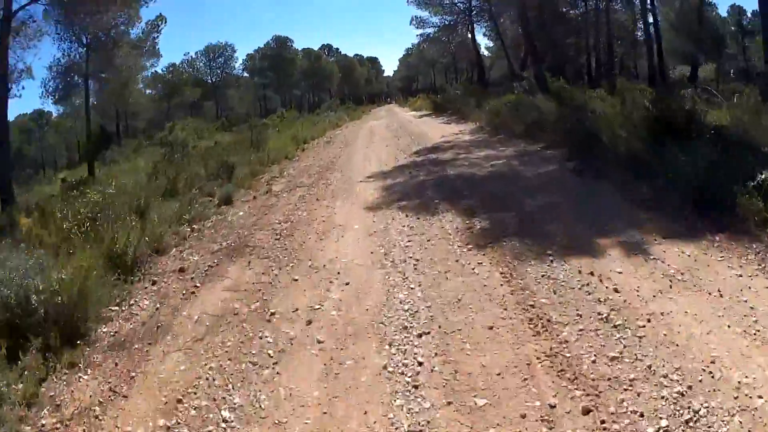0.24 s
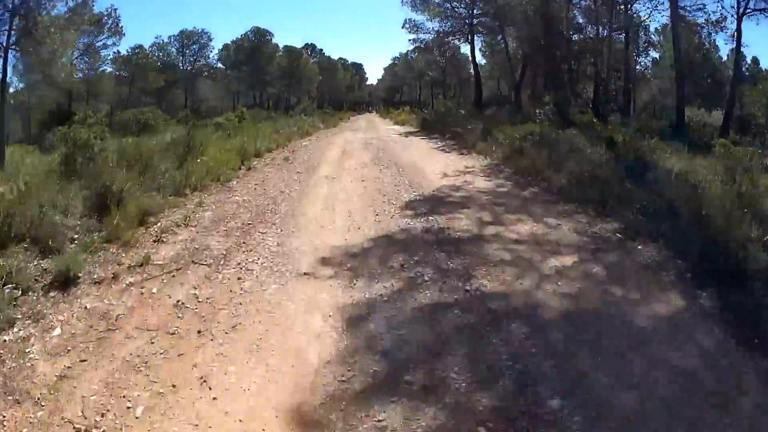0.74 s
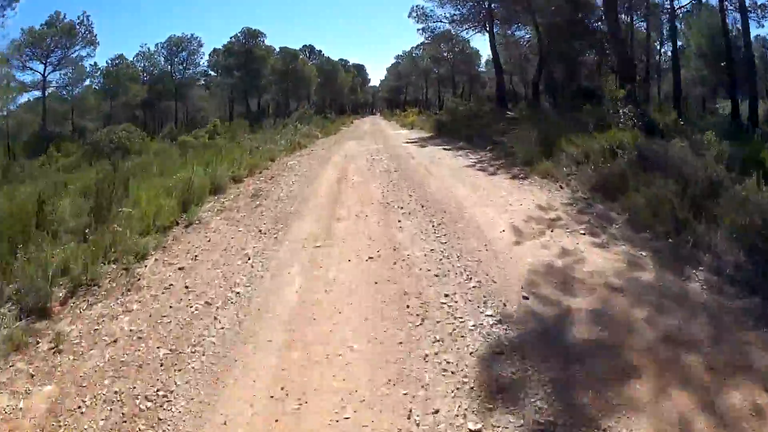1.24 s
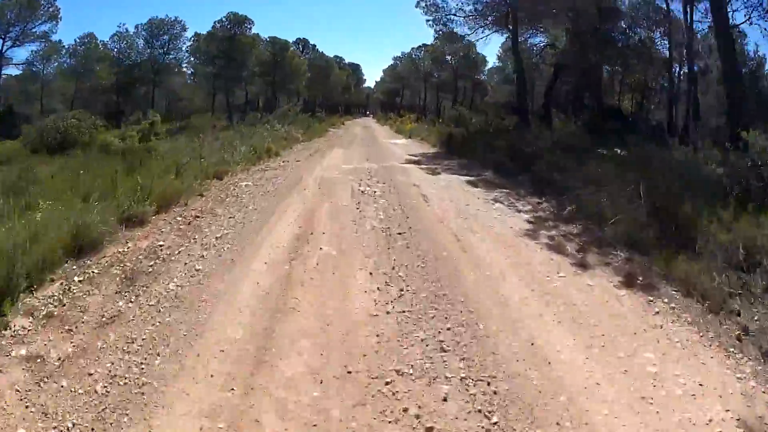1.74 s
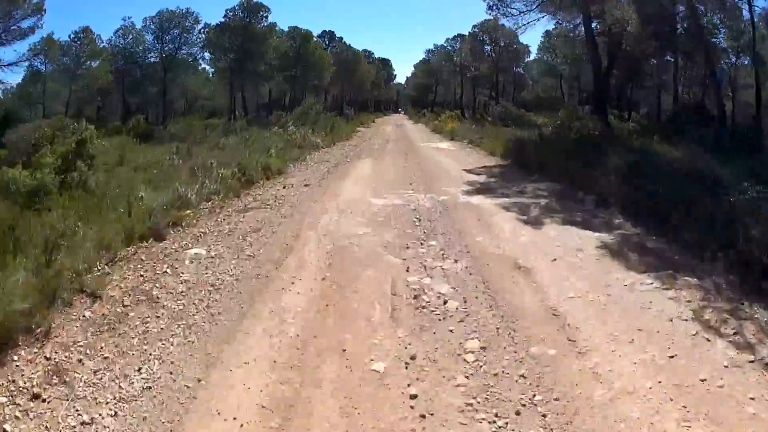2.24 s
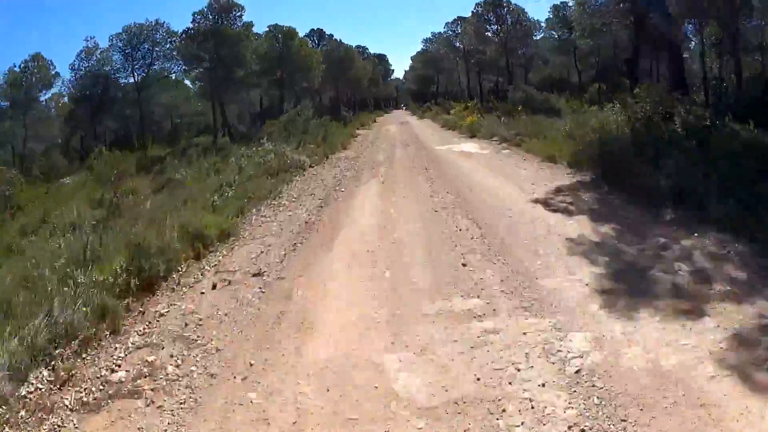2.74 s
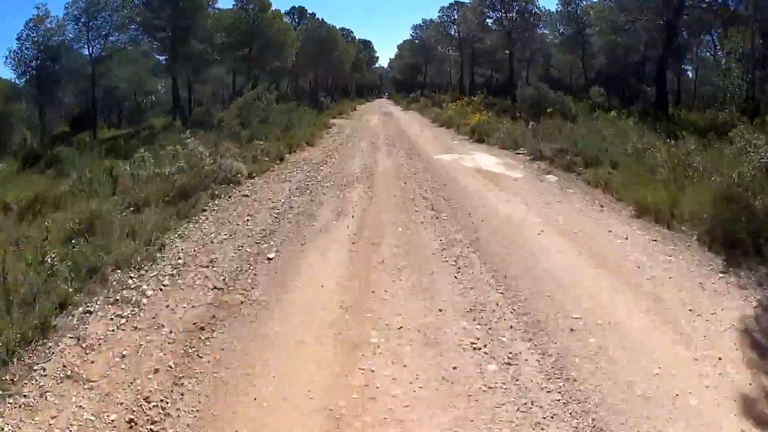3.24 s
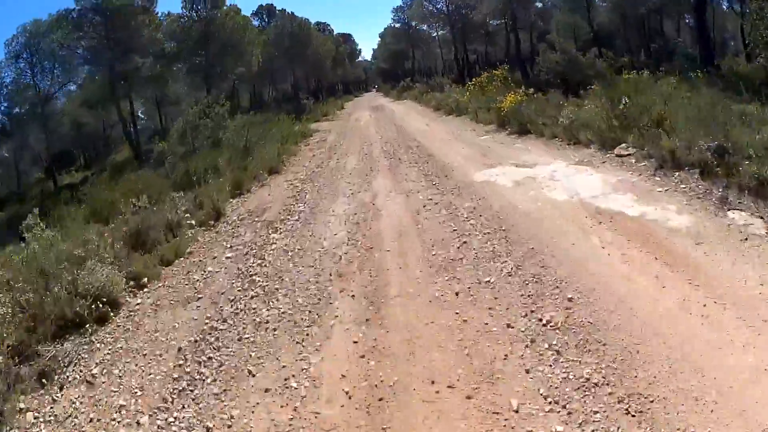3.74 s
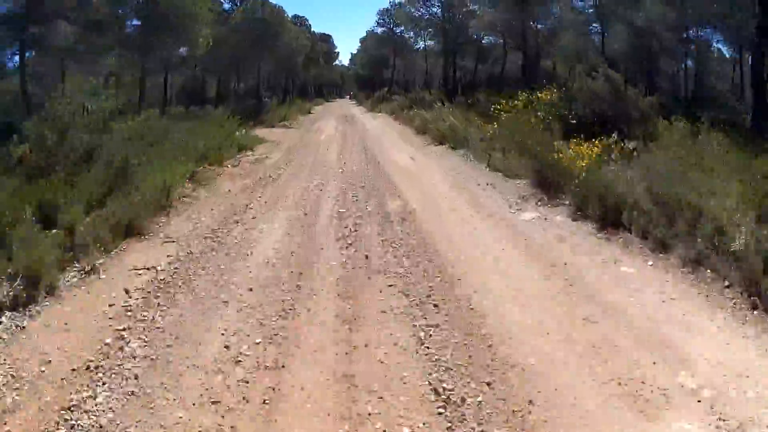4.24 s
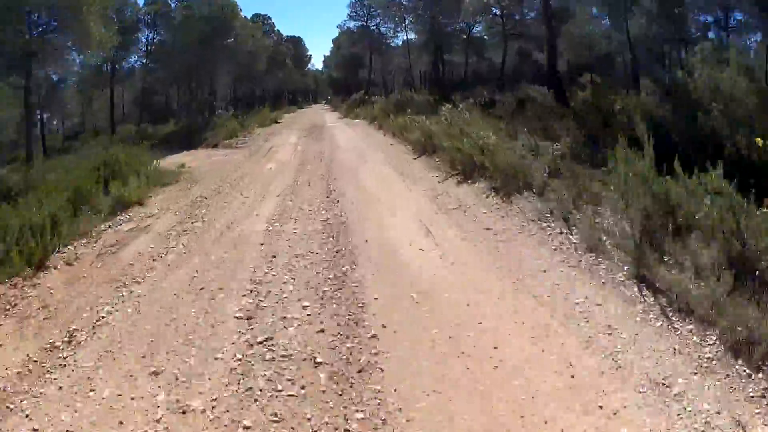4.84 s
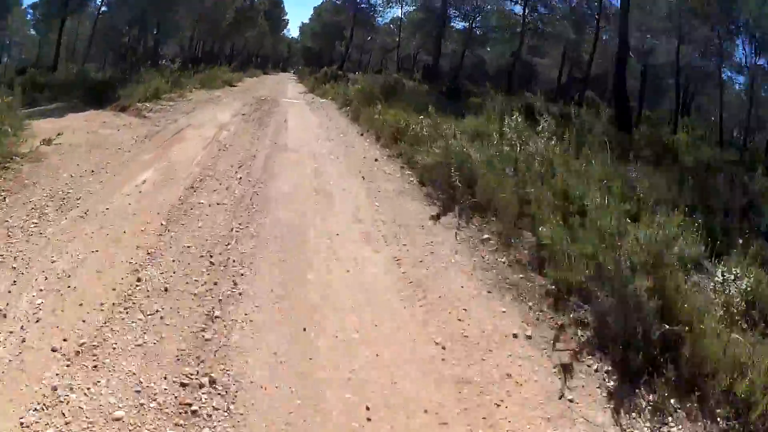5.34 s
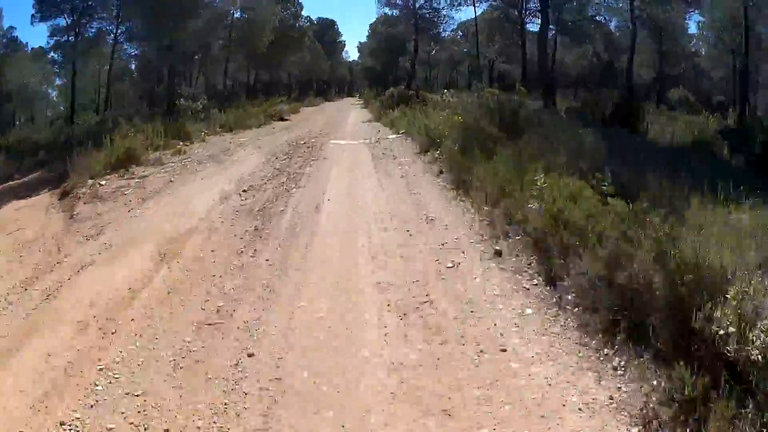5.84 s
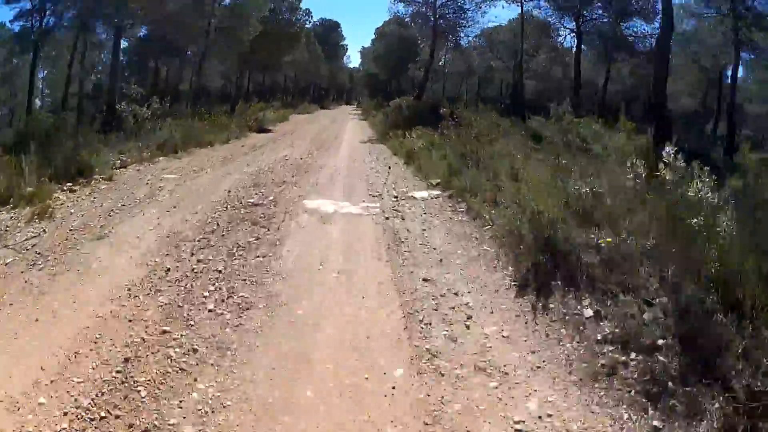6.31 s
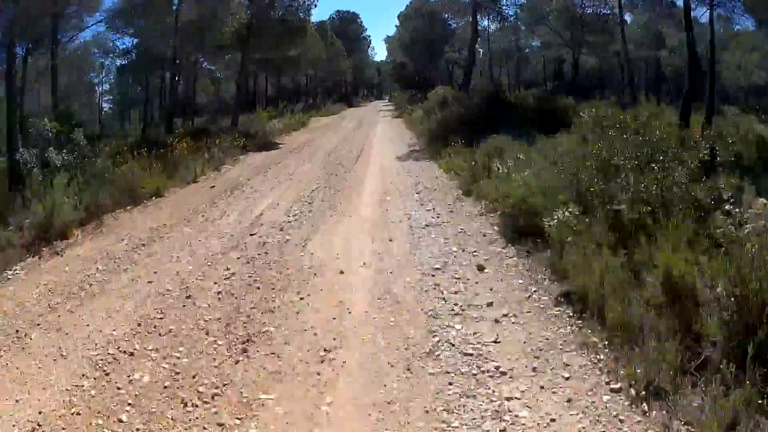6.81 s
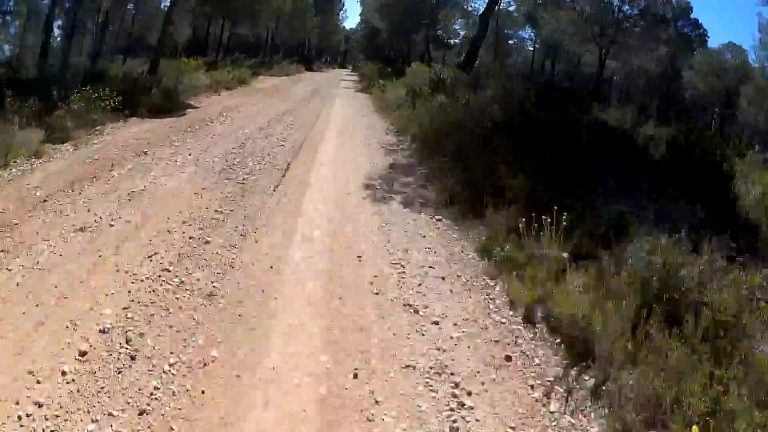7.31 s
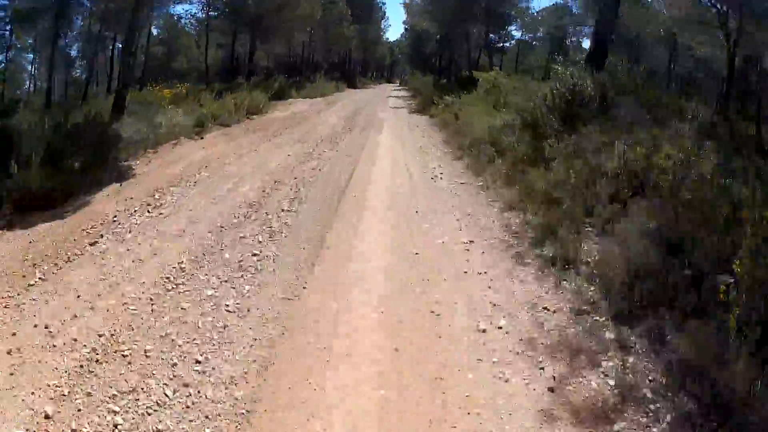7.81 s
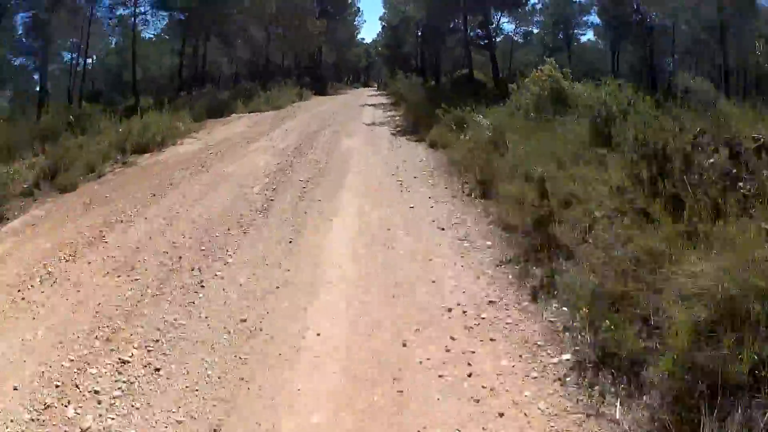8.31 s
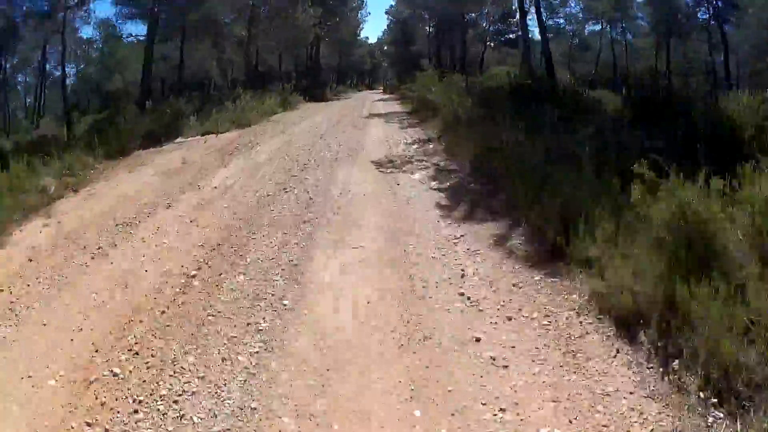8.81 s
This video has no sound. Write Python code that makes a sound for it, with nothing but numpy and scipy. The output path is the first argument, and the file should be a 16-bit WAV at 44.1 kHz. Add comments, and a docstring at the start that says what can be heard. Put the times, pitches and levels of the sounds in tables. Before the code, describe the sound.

Bicycle tyres crunch over loose gravel while stones crack against the frame and the bike rumbles and rattles, growing louder.

```python
"""Hard knocks, then rumbling and crunching: a bicycle rolls faster and faster over loose gravel,
heard from a camera clamped to it. Stones crunch under the tyres and crack on the frame, and a loose
part chatters. Loudest is the camera mount: the road shakes it and ruts jolt it, and its ringing
reaches two microphones through the closed case. The case dulls the treble; the hardest jolts clip."""
import sys
import numpy as np
from scipy import signal
from scipy.fft import rfft, irfft, next_fast_len
from scipy.io import wavfile
from scipy.ndimage import uniform_filter1d, map_coordinates

SR = 44100
rng = np.random.default_rng(int(sys.argv[2]) if len(sys.argv) > 2 else 0)


def master_out(mix):
    """Clip the mix to full scale and print it as 16-bit PCM to the path in sys.argv[1]."""
    frames = np.transpose(np.atleast_2d(mix))
    ceiling = np.clip(frames, -1, 1)
    pcm = np.round(ceiling * 32767).astype(np.int16)
    wavfile.write(sys.argv[1], SR, pcm)


N = 399546
ROCK_HZ = 64.5  # how fast the mount rocks
MUFFLE_HZ = 4860  # the case muffles taps and cracks above this


def amp(db):
    """Turn decibels into a gain."""
    return 10 ** (np.asarray(db) / 20)


def unit(x):
    """Scale x to an average (rms) level of 1."""
    return x / np.sqrt(np.mean(x ** 2) + 1e-20)


def curves(rows):
    """One value per sample for each column after the time."""
    times, *columns = np.transpose(rows)
    return [np.interp(np.arange(N) / SR, times, column) for column in columns]


def wobble(rate):
    """A smooth random curve through rate points a second."""
    return map_coordinates(rng.standard_normal(int(N * rate / SR) + 4), [np.arange(N) * rate / SR])


def filtered(x, response):
    """Filter x with a response given as a function of frequency."""
    size = next_fast_len(N + SR // 4, True)
    return irfft(rfft(x, size) * response(np.fft.rfftfreq(size, 1 / SR)), size)[..., :N]


def mode(f, hz, width):
    """A resonance with gain 1 at hz: the narrower it is, the longer it rings."""
    return 1j * f * width / (hz * hz - f * f + 1j * f * width)


def coloured(x, points):
    """Shape the tone of a stereo sound by rows of (frequency [Hz], left [dB], right [dB])."""
    size = 4096
    hz, *sides_db = np.transpose(points)
    log_f = np.log(np.fft.rfftfreq(size, 1 / SR) + 1)
    gains = amp([np.interp(log_f, np.log(hz), db) for db in sides_db])
    cepstrum = irfft(np.log(gains), size)
    cepstrum[:, 1:size // 2] *= 2  # folded so the filter rings after a hit, never before
    cepstrum[:, size // 2 + 1:] = 0
    return signal.fftconvolve(x, irfft(np.exp(rfft(cepstrum)), size), axes=1)[:, :N]


def stereo_noise(alike):
    """Left and right white noise; alike runs from 0 (unrelated) to 1 (the same)."""
    a, b = rng.standard_normal((2, N))
    turn = np.arccos(np.clip(alike, -1, 1)) / 2
    return np.array([np.cos(turn) * a + np.sin(turn) * b, np.cos(turn) * a - np.sin(turn) * b])


def bursts(rate, spread_db, t60):
    """Loudness of random hits, few large and many small, each fading 60 dB in t60 seconds."""
    when, size = rng.random((int(rate * 10), 2)).T
    starts = (when * (N - 1)).astype(int)
    gain = amp(-spread_db * np.log(1 - size * .975) + 2.3 * wobble(16)[starts])
    decay = amp(-60 / (t60 * SR))
    return unit(signal.lfilter([1], [1, -decay], np.bincount(starts, gain, N)))


def pebbles(rate, spread_db, cycles):
    """Small stones snap, each a short fading tone with its own pitch and left-right balance."""
    when, size, pitch, life, side = rng.random((int(rate * 10), 5)).T[..., None]
    hz = 700 * 8.0 ** pitch
    t = np.arange(200) / SR
    tones = np.sin(2 * np.pi * hz * t) * np.exp(-t * hz / (cycles * (0.22 + life))) * hz / 2000
    starts = (when * (N - 1)).astype(int)
    tones *= amp(-spread_db * np.log(1 - size * .93) + 4.5 * wobble(20)[starts])
    samples = (starts + np.arange(len(t))).ravel()
    sides = [tones * amp(pan_db * (side - 1.5)) for pan_db in (3, -3)]
    return unit(np.array([np.bincount(samples, x.ravel(), N)[:N] for x in sides]))


# How rough the track is: (time [s], mount drumming [dB], roar [dB], crunch [dB], spray [dB])
ROUGHNESS = [(0.0, -22, -53, -45, -69), (0.33, -32, -60, -47.5, -69.5), (0.83, -35, -58.5, -44, -68.5),
             (1.71, -30.5, -55.5, -43, -67), (1.97, -31, -55, -42.5, -66.5), (2.42, -33, -53, -43.5, -67.5),
             (2.75, -29.5, -51, -44.5, -66), (3.18, -31, -46, -41.5, -66), (3.56, -25, -50.5, -44, -64.5),
             (4.06, -33.5, -52, -42.5, -66.5), (4.22, -32, -48, -40.5, -67), (4.5, -28, -47.5, -43, -62.5),
             (4.66, -28, -45, -40.5, -64), (4.76, -32, -48, -48, -63), (4.86, -31, -53, -45.5, -68),
             (5.0, -33, -51.5, -42.5, -68), (5.12, -26.5, -59, -38.5, -61.5),
             (5.24, -29, -45, -42.5, -66.5), (5.43, -29.5, -50.5, -42.5, -69), (5.7, -28, -59, -40, -64.5),
             (6.03, -28.5, -40.5, -39.5, -63), (6.38, -23, -36.5, -37.5, -59.5),
             (6.6, -28, -38.5, -40, -61), (6.74, -22.5, -36.5, -39, -62), (7.01, -26, -46.5, -39, -66),
             (7.32, -24.5, -37.5, -39.5, -64), (7.77, -23.5, -44, -40.5, -66.5),
             (8.0, -23, -37.5, -41.5, -63.5), (8.38, -26, -38, -38, -65), (8.58, -19.5, -34.5, -42.5, -65),
             (8.7, -20, -37.5, -39, -56), (9.06, -25, -40.5, -40.5, -67)]
# Tone of roar, crunch and bright hits through the case: (frequency [Hz], left [dB], right [dB])
ROAR_TONE = [(200, -31, -18.5), (470, -2, -3.5), (756, -5.5, -4), (900, -4.5, -11.5), (1500, -9.5, -12),
             (2580, -21.5, -21), (6000, -73.5, -77)]
CRUNCH_TONE = [(300, -33.5, -32.5), (940, 0.5, -1.5), (1480, 1, -1.5), (2890, 4, -1), (3200, 3.5, -3.5),
               (4640, -2, -11), (5160, -15, -16), (5650, -18.5, -28.5), (7700, -53.5, -44.5),
               (20000, -100, -100)]
BRIGHT_TONE = [(3000, -54, -22.5), (5100, -9, 11), (6050, 4, -3), (8100, 6, 5.5), (10430, 4.5, 3),
               (12200, -6.5, -10), (14900, -30, -26), (19600, -55, -53.5)]


def tyres():
    """Tyres on gravel make a dull roar, a hissy crunch of small stones and a spray of fine grit."""
    roar_db, crunch_db, spray_db = curves(ROUGHNESS)[1:]
    grit = bursts(190, spread_db=3.5, t60=0.028)
    fine = bursts(520, spread_db=7, t60=.003)
    roar = stereo_noise(0.43) * (0.5 + 0.86 * grit) * amp(1.1 * wobble(25) + 1.3 * wobble(6.6))
    hiss = stereo_noise(0.73) * (0.7 + 0.8 * grit + 0.24 * fine) * amp(0.54 * wobble(25))
    crunch = hiss + 0.63 * pebbles(500, spread_db=2.8, cycles=2.4)
    spray = stereo_noise(0.23)
    spray *= .5 + 0.52 * grit + 0.3 * fine + 0.2 * bursts(150, spread_db=1.0, t60=.004)
    return (amp(roar_db) * unit(coloured(roar, ROAR_TONE))
            + amp(crunch_db) * unit(coloured(crunch, CRUNCH_TONE))
            + amp(spray_db) * unit(coloured(spray, BRIGHT_TONE)))


# When the loose part chatters: (start [s], end [s], tapping [dB], rubbing [dB])
CHATTER_RUNS = [(0.383, 0.799, -0.5, -44), (1.095, 1.26, -2, -41), (1.478, 1.55, 0, -35),
                (1.821, 2.0, 2, -38), (2.053, 2.11, 4, -17), (2.158, 2.215, 5.5, -23),
                (2.245, 2.29, -1, -20), (2.368, 2.402, 3, -30), (2.46, 2.667, 3, -27.5),
                (2.695, 2.79, 4.5, -36), (2.81, 2.96, 0, -34), (3.5, 3.844, 2, -38),
                (3.924, 4.002, 0.5, -35), (4.267, 4.32, 2, -30), (4.385, 4.408, 3.5, -32),
                (4.448, 4.521, 6.5, -20), (4.773, 4.836, 0, -26.5), (4.88, 4.96, -7, -34),
                (5.017, 5.057, 0, -29), (5.074, 5.195, -0.5, -28), (5.249, 5.305, 5.5, -20),
                (5.59, 5.755, -4.5, -29), (5.78, 5.877, -0.5, -41), (6.38, 6.495, 4.5, -32),
                (6.512, 6.755, 3.5, -17), (6.79, 6.995, 2.5, -18), (7.436, 7.713, -1, -44),
                (7.792, 8.303, 2.5, -34), (8.45, 8.858, 0, -36)]
# How it rings: (pitch [Hz], width [Hz], left [dB], right [dB])
LOOSE_MODES = [(1455, 1100, -15.5, -16.5), (1764, 273, -28, -4), (2130, 1200, -15.5, -29),
               (2680, 350, -12, -15.5), (3770, 196, -10, -12)]


def chatter():
    """A loose part taps once or twice per swing of the mount and rubs in between."""
    gap, size, sign, *favours = rng.random((1200, 3 + len(LOOSE_MODES))).T
    times = np.cumsum((.35 + .6 * gap) / ROCK_HZ)
    t = np.arange(N) / SR
    gain = sum(amp(db) * (times > start) * (times < end) for start, end, db, _ in CHATTER_RUNS)
    gain *= amp(4.8 * (size - 0.93)) * np.sign(sign - .5)
    rub = sum(amp(db) * (t > start) * (t < end) for start, end, _, db in CHATTER_RUNS)
    rub = uniform_filter1d(rub, int(0.015 * SR)) * amp(2.1 * wobble(40))
    out = 0
    for (hz, width, left_db, right_db), favour in zip(LOOSE_MODES, favours):
        strength = gain * amp(4.3 * (favour - 0.67))  # each tap favours different pitches
        taps = np.bincount((times * SR).astype(int), strength, N)[:N]
        scrape = 0.36 * signal.lfilter([1], [1, -.985], taps)  # trails each tap
        rubbing = rub * amp(-5.0 * (hz > 2000))  # stirs high pitches less
        force = taps + (scrape + rubbing) * rng.standard_normal(N)
        ring = filtered(force, lambda f: mode(f, hz, 0.79 * width) * mode(f, hz, 4 * width)
                        / (1 + (f / MUFFLE_HZ) ** 6))
        out += amp([[left_db], [right_db]]) * ring
    return out


# Tone of a crack's dull part: (frequency [Hz], left [dB], right [dB])
DULL_TONE = [(250, 1.5, 4), (574, 24.5, 28), (1362, 25.5, 24.5), (2320, -35.5, -43), (5950, -64.5, -54)]
# Stones hitting the frame:
# (time [s], level [dB], pitch [Hz], dull part [dB], bright part [dB], length [ms], left over right [dB])
CRACKS = [(0.001, -28.5, 2080, 2, -11.5, 13, 0), (0.014, -30, 2340, -3, -36, 5.6, 0),
          (0.029, -27.5, 2730, -3, -24, 12.6, 4.5), (0.049, -35.5, 2360, -6, -14, 11, 0),
          (0.154, -34, 2300, -8, -34, 1.7, -1), (0.18, -26, 2700, -4.5, -20, 9.6, 0.5),
          (0.2357, -18, 2580, -8, -14, 4.1, -1), (1.1196, -31, 1840, -1.5, -19, 6.6, 3),
          (1.1345, -36.5, 1600, 3, -14, 4.9, 2), (1.2014, -30, 1500, -2, -53, 3, 6),
          (1.2186, -32, 2930, 0.5, -40, 1.6, 1), (1.5375, -28, 2510, 4, -15, 2.2, 6),
          (1.5405, -34, 4180, -12, -18, 2.1, 0), (1.6734, -25, 1940, -4, -28, 9.6, 0),
          (1.6899, -31, 2070, -4, -18, 15, 1), (1.9267, -22, 2930, -22, -19, 1.2, 8),
          (2.0598, -28, 2070, -11, -23, 1.3, 3), (2.6447, -29.5, 2320, -14, -38, 1.7, 4),
          (2.8435, -35.5, 2650, -33, -10, 3.5, 1), (2.9017, -33.5, 1900, -10, -17.5, 15, 2),
          (2.9552, -28.5, 1920, -8.5, -40, 0.89, 4), (3.1183, -24.5, 2480, -11.5, -31, 3, -1),
          (3.129, -30.5, 3440, -5, -1.5, 3, 7), (3.304, -15, 2150, -6, -23, 1.14, 1),
          (3.387, -39, 2500, -2, -12, 5.2, -1), (3.42, -30.5, 2240, -3, -49, 1.1, 2),
          (3.444, -17.5, 3640, -4.5, -15.5, 6.3, -1), (3.472, -34, 3060, -8, -8, 1.8, 2),
          (3.495, -38, 3260, -19, -14, 1.7, 5), (3.529, -40, 4030, -10, -2, 2.1, 6),
          (3.553, -30.5, 2260, -8, -17, 2.9, 1), (3.5977, -35.5, 2200, -9, -17, 6.3, 0),
          (3.645, -27, 2800, -5, -40, 1.5, 4), (3.731, -26, 2200, -36, -40, 1.1, 1),
          (4.384, -29, 2110, -6, -23, 1.1, -2), (4.527, -24, 1960, -11, -36, 0.77, 1),
          (4.654, -26, 2280, -11, -40, 1.6, 4), (4.689, -39.5, 4900, -25, -20, 2.2, 7),
          (4.2906, -33.5, 2400, -11, -37, 1.2, 2), (4.618, -36, 1800, -10, -40, 1, -10),
          (4.7052, -38.5, 2780, -9, -35, 4.2, 2), (4.795, -37, 3000, -15, -7, 1.5, -2),
          (5.0197, -34.5, 2500, -11, -33, 3.6, 3), (5.2662, -34, 2700, -10, -35, 1.5, 2),
          (5.293, -35, 1510, 2.5, -38, 1.8, 1), (5.5979, -30.5, 1900, -9, -38, 1.2, 4),
          (5.7864, -35.5, 3500, -5, -10, 1.7, 4), (5.816, -26.5, 2170, -12, -39, 1.3, 4),
          (5.8457, -29.5, 2680, -22, -24, 2.3, 5), (5.9103, -29, 2490, -18, -33, 1.3, 2),
          (6.005, -33, 2000, -12, -33, 2.5, -5), (6.085, -32, 2680, -17, -34, 2.5, 2),
          (6.2696, -33, 2400, -5, -36, 2.5, 2), (6.4744, -38, 2200, -5.5, -30, 2.5, 8),
          (6.04, -32, 2600, -20, -37, 6.8, 4.5), (6.3407, -22, 1390, -22, -51, 2.2, -3),
          (6.851, -32, 1790, 0.5, -20, 7.4, 3), (7.104, -32.5, 2000, -6, -30, 5, 2),
          (6.949, -25.5, 2350, -1.5, -15, 1.4, 4), (7.803, -29.5, 2220, -7, -28, 1.6, 7),
          (7.8754, -27, 2360, -4, -23, 0.96, 6), (7.9213, -28, 2110, -5.5, -12, 1.5, 1),
          (8.2347, -26.5, 2320, -3, -36, 1.2, 11), (8.3854, -14.5, 4680, -21, 0.5, 1.3, 3),
          (8.3856, -11.5, 3150, -17, -28, 2.6, 0), (8.499, -27, 2280, -24, -38, 1.4, -2),
          (8.524, -37, 4200, -20, -5, 1.5, 5), (8.5296, -24.5, 3860, -12, -14.5, 4.3, -1),
          (8.6151, -20, 4450, -15, -6, 1.5, 3), (8.62, -26.5, 4200, -27, -5, 2.1, 6),
          (8.649, -32.5, 3500, -22, -3, 3.1, 4), (8.678, -36, 4230, -23, -8, 2, 1),
          (8.7, -31.5, 2900, -15, -19, 8.2, 2), (8.724, -42, 4200, -18, -14, 2.8, 7),
          (8.755, -28.5, 2540, -21, -29, 0.7, 8), (8.800, -37, 4200, -23, -7, 1.6, 3),
          (8.8225, -38, 3520, 3, -11.5, 10, 3), (8.850, -46, 4270, -22, -9, 8, -3)]


def stones():
    """A stone cracks on the frame: a noise burst with a dull knock, a ring and a bright fizz."""
    t = np.arange(4096) / SR
    f = np.fft.rfftfreq(len(t), 1 / SR)
    rattle = 0.1 * amp(-60 * t / 0.042)
    parts = np.zeros((3, 2, N + len(t)))
    for start, db, hz, dull_db, bright_db, ms, pan_db in CRACKS:
        length = ms / 1000
        swell = 1 - np.exp(-t / (0.00008 + 0.14 * length))  # longer cracks start more slowly
        shape = swell * amp(-11 * t / length) + rattle
        middle, side = rng.standard_normal((2, len(t)))
        side = side * [[1], [-1]]
        late_swell = (1 - np.exp(-t / 0.00067)) ** 2
        fizz = shape * late_swell * amp(-4 * t / length) * (middle + 0.9 * side)
        overtone = amp(6.5) * mode(f, 2.305 * hz, 0.18 * hz)
        fizz = irfft(rfft(fizz) * (1 + overtone))
        middle[8:10] += [8.6, -8.6]  # the first contact is a hard click
        burst = shape * (middle + 0.51 * side)
        # the brightest stones hit near the microphone openings, so the case muffles them less
        edge_hz = max(MUFFLE_HZ, 1.35 * hz)
        muffle = signal.freqs(*signal.butter(6, edge_hz, analog=True), f)[1] ** 2
        ring = irfft(rfft(burst) * mode(f, hz, 1.3 * hz) * mode(f, hz, 0.67 * hz) * muffle)
        ring /= np.sqrt(np.sum(ring ** 2) / (2 * SR * (length + 0.00098)))  # evens out chance loudness
        gains = amp(db + np.array([dull_db, 0, bright_db]))[:, None, None]
        pan = amp([[pan_db / 2], [-pan_db / 2]])
        at = round(start * SR)
        parts[..., at:at + len(t)] += gains * pan * [0.81 * burst, ring, 1.52 * fizz]
    dull, ring, bright = parts[..., :N]
    return coloured(dull, DULL_TONE) + ring + coloured(bright, BRIGHT_TONE)


# How hard the mount rocks: (time [s], level [dB])
ROCK_LEVELS = [(0, -37), (.7, -37.5), (1.3, -33), (2.2, -33.5), (3, -27.5), (4, -29.5), (4.9, -32),
               (5.6, -28.5), (7, -28.5), (8.2, -31.5), (9.06, -26.5)]


def mount_rocking():
    """The mount rocks with a deep rumble, pushing the two microphones in opposite directions."""
    noise = rng.standard_normal((2, N))
    rock, common = filtered(noise, lambda f: mode(f, ROCK_HZ, 13.8) * mode(f, ROCK_HZ, 60))
    rock, common = unit(rock), 0.3 * unit(common)
    level = amp(curves(ROCK_LEVELS)[0] + 2 * wobble(11))
    return level * amp([[6.05], [0.5]]) * np.array([common + rock, common - rock])


# Jolts from ruts: (time [s], strength [dB], extra for the higher pitches [dB])
RUTS = [(0.002, 2, -2), (0.024, -9, 18), (0.044, 1.5, -0.5), (0.156, -18, 10), (0.179, -11.5, 16.5),
        (0.192, -6, 3), (0.235, -8.5, 14.5), (0.249, -6, -17), (1.120, -9.5, 5), (1.130, -9, 0),
        (1.201, -12.5, 7), (1.217, -13, 5), (1.334, -12.5, -8), (1.426, -15.5, 5.5), (1.512, -10, 0),
        (1.537, -4, 11), (1.675, -16, 20.5), (1.689, -8.5, 8.5), (1.701, -9, 9), (2.094, -11.5, -16),
        (2.639, -10.5, -13), (2.905, -6.5, 0), (3.118, 0.5, 3.5), (3.129, -20, -7), (3.443, 0.5, 10.5),
        (3.457, -12, 2), (4.136, -10, -15), (4.497, -8, -37), (4.382, -13, -12), (4.433, -13, -24),
        (4.546, -18, -22), (4.66, -17, -22), (5.04, -12.5, -18), (5.092, -10, -15), (5.172, -16, -25),
        (5.788, -11.5, -18), (6.371, -11, -16), (6.398, -10.5, -16), (6.7, -19, -29), (7.534, -10, -29),
        (7.929, -8, -8), (8.05, -11, -18), (8.122, -4.5, 0), (8.385, -7, 7), (8.479, -4, -20),
        (8.572, -5, -15), (8.694, -2, 7.5), (8.819, -9.5, 15.5), (8.858, -1.5, -10), (8.894, -3, -30),
        (8.989, -2.5, -17)]
# How the mount rings: (pitch [Hz], width [Hz], left [dB], right [dB], signed right gain [factor])
MOUNT_MODES = [(134.5, 75, -3, -20, -0.92), (190, 80.5, -8, -4, 0.72), (244.3, 60, 0, 0.5, 0.91),
               (309.1, 27, -23.5, -4, 0.49), (349.4, 52, -5.5, -28, -0.17), (418, 53.5, -4, -28, 0.73)]


def mount_drumming():
    """The rough road and its ruts make the mount ring; each microphone hears its own mix."""
    band_hz, rebound_s, rattle_s = 132.5, 0.0015, 0.01816
    times, jolt_db, upper_db = np.transpose(RUTS)
    shaking = amp(curves(ROUGHNESS)[0] + 0.18 * wobble(4.6))
    shaking *= np.sqrt(SR / band_hz)  # makes up for the narrow band of noise that rings
    shaking *= 0.71 + 0.27 * bursts(70, spread_db=2.5, t60=0.11)
    shared = rng.standard_normal(N)
    rubber = np.hanning(SR // 800) / (SR / 1600)  # rubber rounds each kick
    out = 0
    for hz, width, left_db, right_db, right_gain in MOUNT_MODES:
        force = shaking * (0.56 * shared + rng.standard_normal(N) + 0.48 * rng.standard_normal((2, N)))
        # a jolt is a kick, its quick rebound and two weaker rattles of the clamp
        luck = rng.random((len(times), 3))
        rattles = times[:, None] + rattle_s * (.4 + .6 * luck[:, :2]) * [.5, 1]
        starts = (np.c_[times, times + rebound_s, rattles] * SR).astype(int).clip(0, N - 1)
        strength = amp(jolt_db + upper_db * (hz > 300) + 3.2 * luck[:, 2])
        gains = strength[:, None] * [0.64, -0.54, 0.26, 0.2]
        kicks = np.convolve(np.bincount(starts.ravel(), gains.ravel(), N), rubber)[:N]
        weight = amp(0.8 * (hz < 160))  # the lowest pitch takes the weight of the blow
        force += kicks * SR / (2 * np.pi * width) * weight
        sides = amp([[left_db], [right_db]]) * [[1], [right_gain]]
        out += sides * filtered(force, lambda f: mode(f, hz, width) * mode(f, hz, 1.92 * width))
    return out


# How the air pockets ring: (pitch [Hz], width [Hz], left [dB], right [dB])
POCKET_MODES = [(748, 17.5, 6, -6.5), (4350, 170, -2, -18)]
# How far the left wave runs ahead of the right: (frequency [Hz], phase [radians])
LEFT_LEAD = [(800, 0.04), (1800, 0.79), (2500, -0.069), (3200, 0.95), (4600, -0.23)]


def air_pockets(f):
    """The air in front of each microphone boosts some pitches and shifts their timing."""
    lead = np.interp(f, *np.transpose(LEFT_LEAD))
    ring = sum(amp([[left], [right]]) * mode(f, hz, width) for hz, width, left, right in POCKET_MODES)
    return np.exp(.5j * lead * [[1], [-1]]) * (1 + ring)


def scene():
    """The mount sounds through the case; everything else passes the air pockets."""
    return mount_rocking() + mount_drumming() + filtered(chatter() + tyres() + stones(), air_pockets)


def record(dry):
    """The loudest peaks clip; then a narrow band of treble and the very top are cut."""
    notch_hz, top_hz, fade_hz = 8000, 15900, 700
    clipped = dry / (1 + np.abs(dry) ** 12) ** (1 / 12)
    return filtered(clipped, lambda f: (1 - mode(f, notch_hz, 230))
                    * np.clip((top_hz - f) / fade_hz, 0, 1))


dry = scene()
out = record(dry)
master_out(out)
```